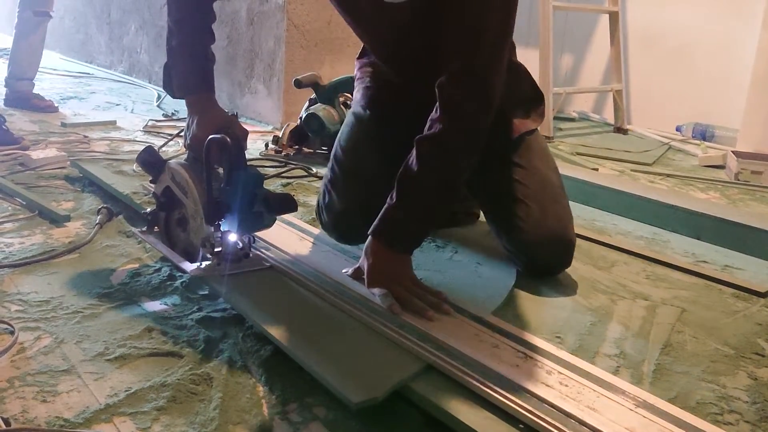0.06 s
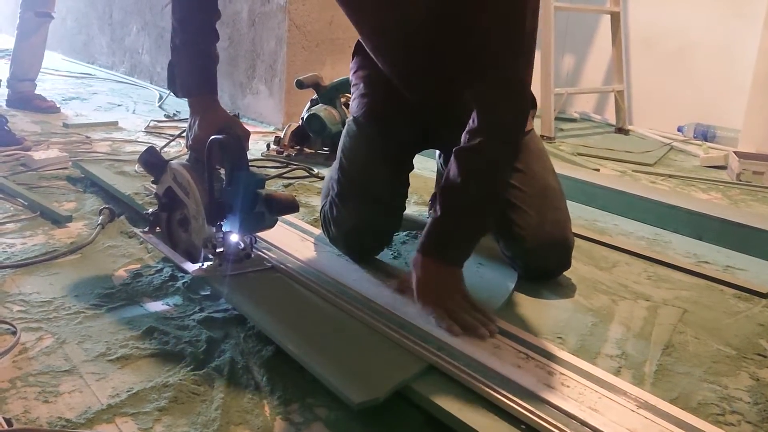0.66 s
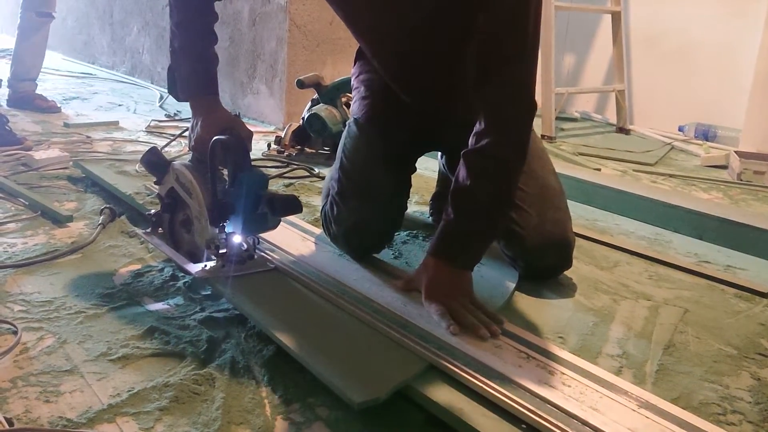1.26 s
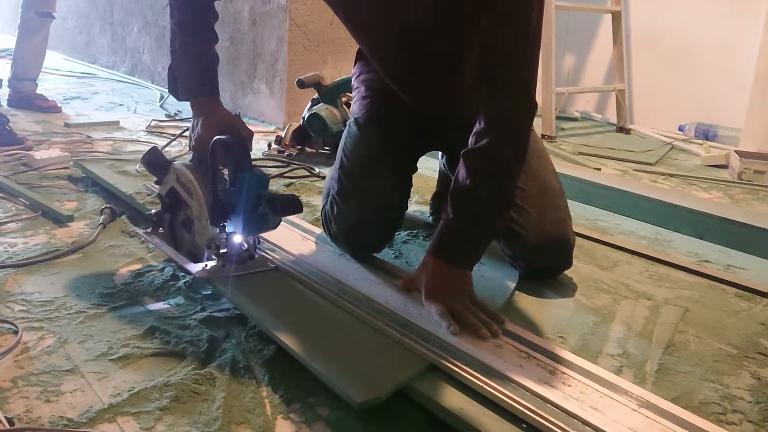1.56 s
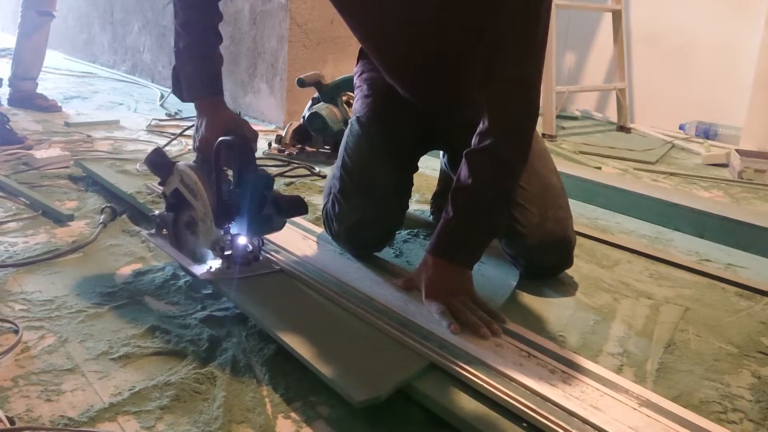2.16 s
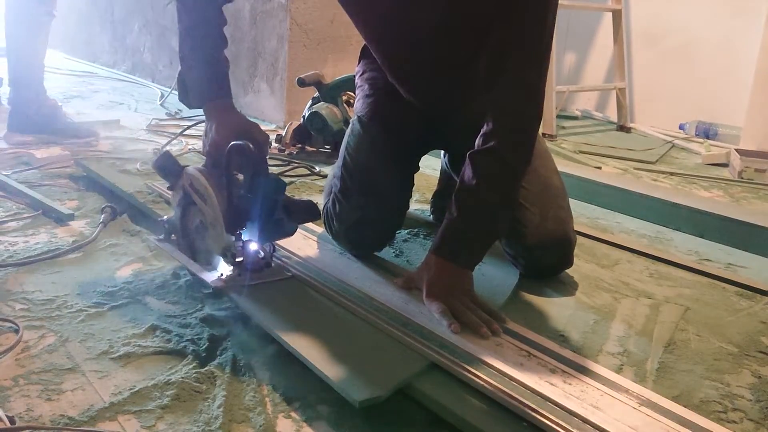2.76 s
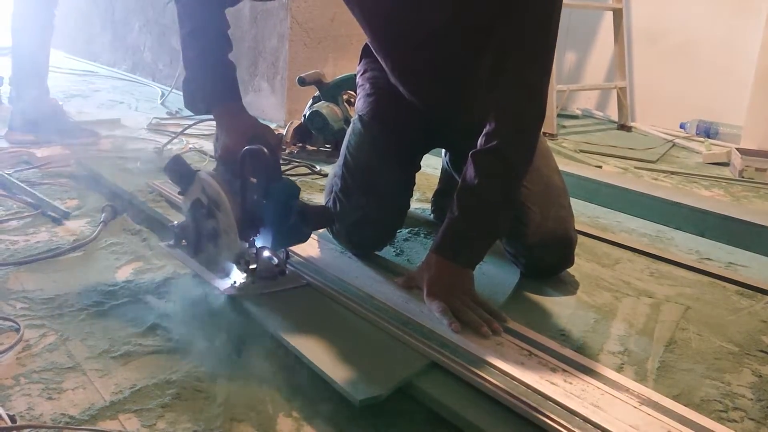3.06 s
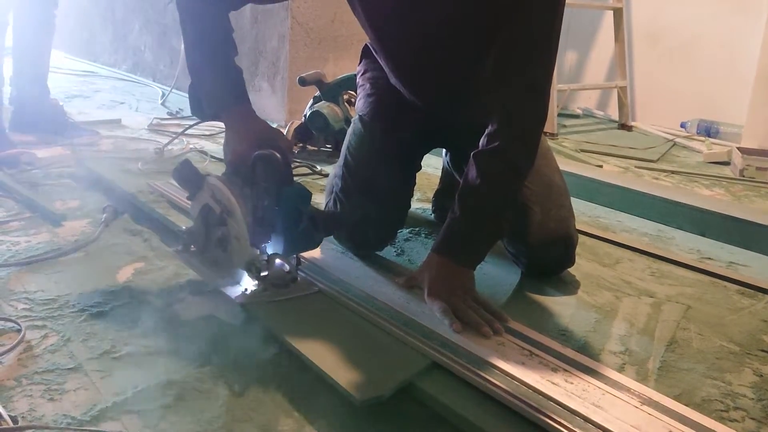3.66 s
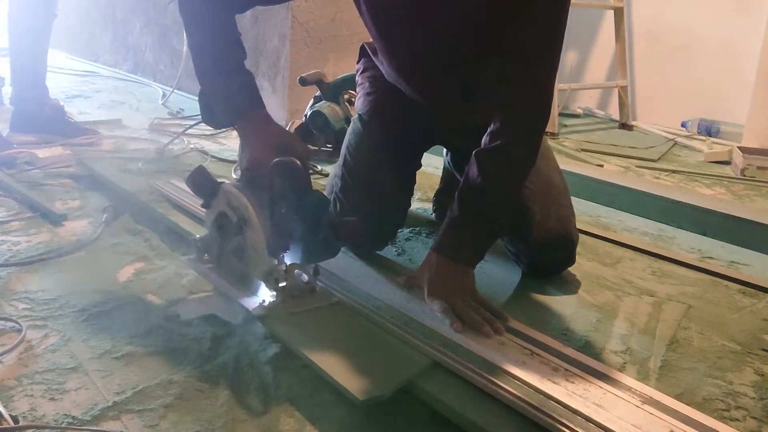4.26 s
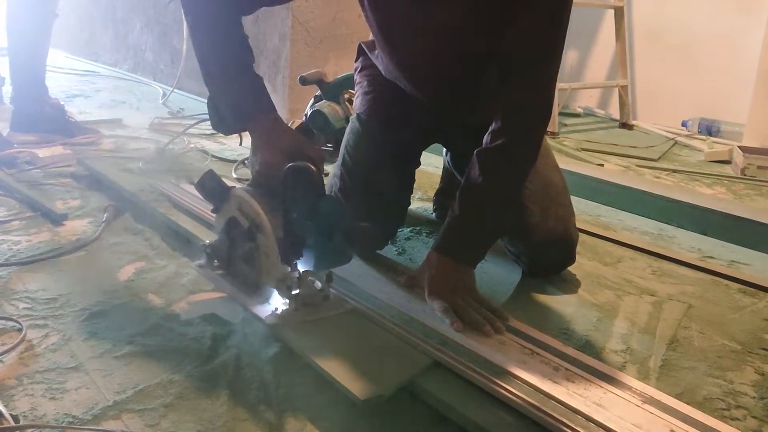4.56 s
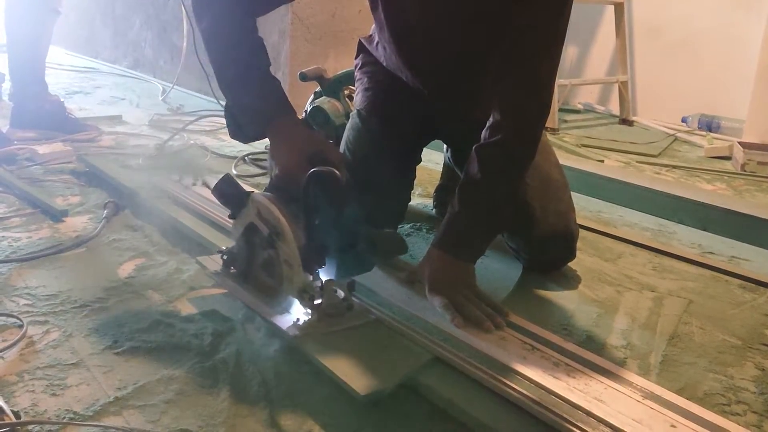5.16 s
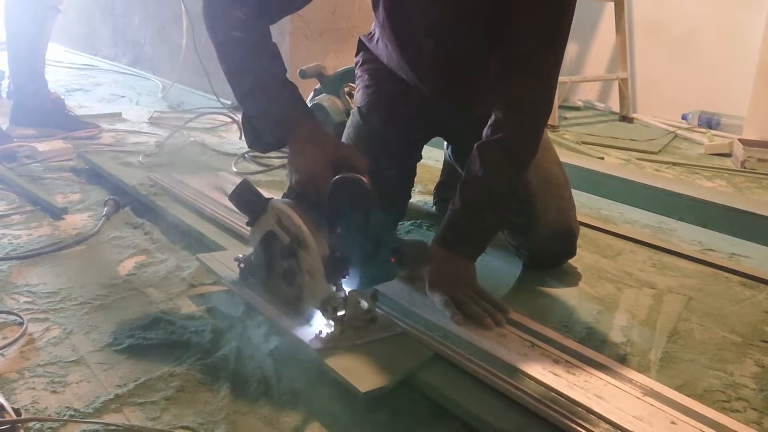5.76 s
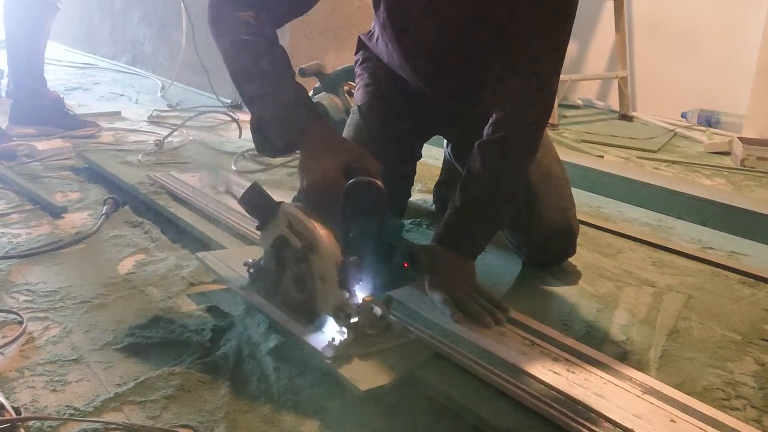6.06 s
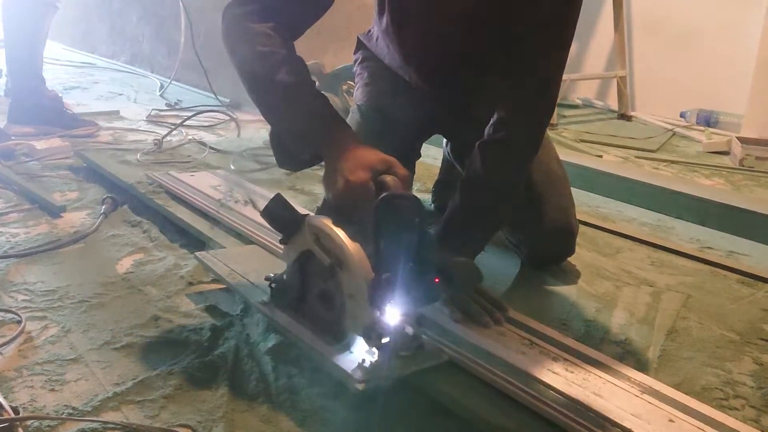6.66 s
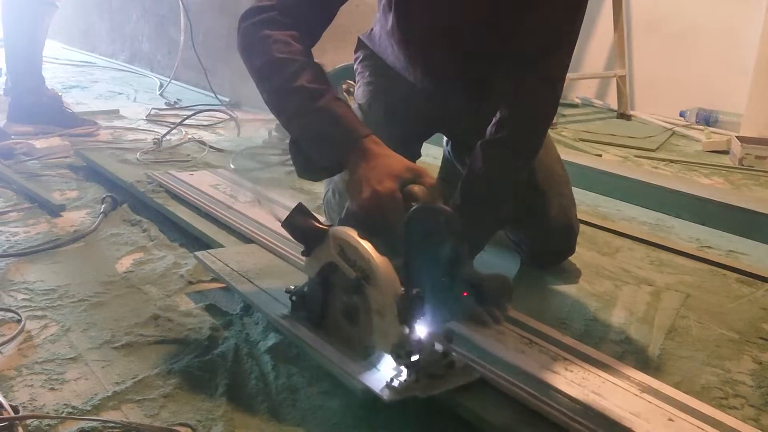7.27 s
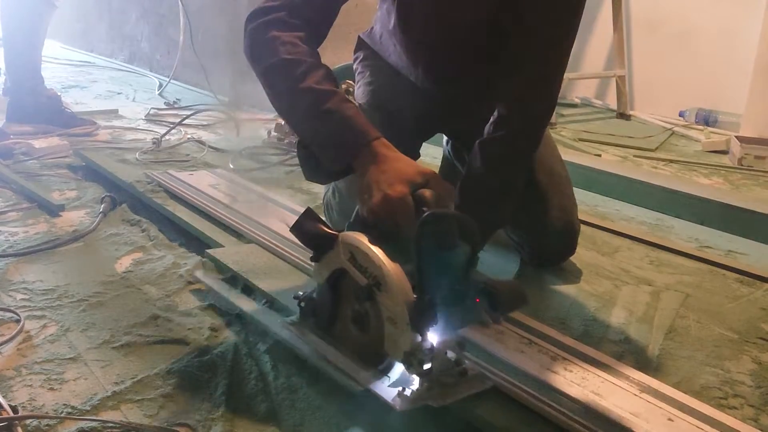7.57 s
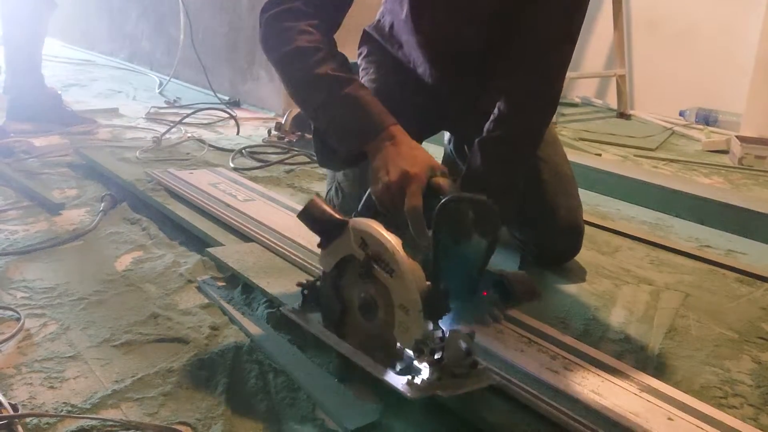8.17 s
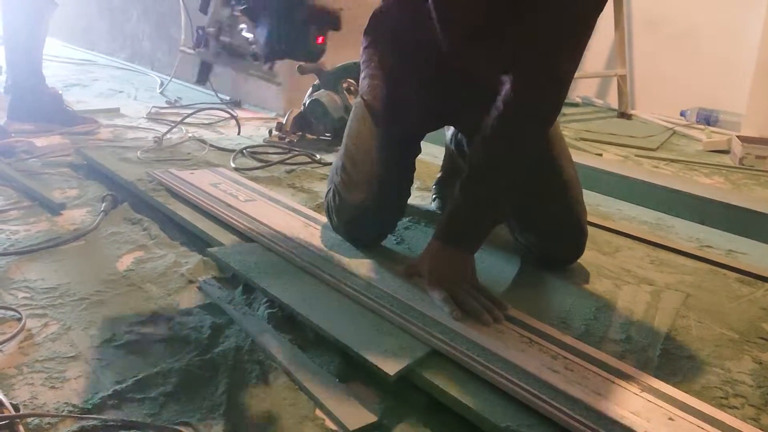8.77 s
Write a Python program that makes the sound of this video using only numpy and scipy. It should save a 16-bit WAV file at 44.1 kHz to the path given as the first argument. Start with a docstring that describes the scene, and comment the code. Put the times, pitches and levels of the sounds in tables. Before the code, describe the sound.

Close up in a bare, slightly echoing room, a cordless circular saw whirs and squeals as it touches a board. It grinds through for about six seconds, hissing and screeching unevenly whenever the blade is pinched, its pitch sagging a little under the load. The saw then brakes in half a second, the guard snaps shut, and a soft metallic ring lingers over a faint low hum.

```python
"""First comes the thin whine and rushing air of a cordless circular saw running free in a bare room.
It grazes a board with a squeal, then is pushed through. The teeth scrape in the same pattern on every
turn, a periodic force that excites the blade's resonances, while the motor sags under the load.
Out of the cut it is braked in half a second, the guard snaps shut and the blade rings on."""
import sys
import numpy as np
from scipy import signal
from scipy.fft import rfft, irfft, next_fast_len
from scipy.io import wavfile
from scipy.ndimage import uniform_filter1d, map_coordinates

SR = 44100
rng = np.random.default_rng(int(sys.argv[2]) if len(sys.argv) > 2 else 0)


def store_pcm(level_fs):
    """Save levels as 16-bit WAV."""
    pcm = np.round(np.clip(level_fs, -1, 1) * 32767).astype(np.int16)
    wavfile.write(sys.argv[1], SR, np.atleast_2d(pcm).T)


N = 397341
TIME = np.arange(N) / SR
SIZE = next_fast_len(N + SR)
HZ = np.maximum(np.arange(SIZE // 2 + 1) * SR / SIZE, 1)
SIDES = np.array([[1], [-1]])  # left, right

# the blade grazes the board, bites in, comes through and is braked
GRAZE_S, BITE_S, THROUGH_S, BRAKE_S = 1.09, 1.78, 7.66, 7.871
FREE_TURNS_PER_S, GEAR_RATIO = 80.6, 49 / 9


def from_db(db):
    """Amplitude ratio of a level in decibels."""
    return 10 ** (np.asarray(db) / 20)


def rms_one(x):
    """Normalisation to unit power."""
    return x / np.sqrt(np.mean(x ** 2) + 1e-20)


def in_time(rows):
    """Linear interpolation of each column over time."""
    times, *columns = np.transpose(rows)
    return [np.interp(TIME, times, c) for c in columns]


def level(rows):
    """Amplitude envelope from rows of t/s, level/dB."""
    return from_db(in_time(rows)[0])


def in_hz(rows):
    """Interpolation of each column over log frequency."""
    hz, *columns = np.transpose(rows)
    return [np.interp(np.log(HZ), np.log(hz), c) for c in columns]


def filtered(x, response):
    """Convolution as a product of spectra."""
    return irfft(rfft(x, SIZE) * response, SIZE)[..., :N]


def shaped(x, spectrum):
    """Spectral shaping by rows of f/Hz, level/dB."""
    return filtered(x, from_db(in_hz(spectrum)[0]))


def coloured(spectrum):
    """Filtered white noise of unit power."""
    return rms_one(shaped(rng.standard_normal(N), spectrum))


def drift(rate):
    """Random modulation of unit spread, with rate new values a second."""
    return np.interp(TIME * rate, np.arange(4096), rng.standard_normal(4096)) * np.sqrt(1.5)


def lagged(x, lag_s):
    """Exponential relaxation towards x."""
    r = np.exp(-1 / (lag_s * SR))
    return signal.lfilter([1 - r], [1, -r], x)


def held(spans, lag_s=0.024):
    """First-order response to rectangular pulses: start/s, end/s, height."""
    steps = np.zeros(N)
    for start, end, value in spans:
        steps[int(start * SR):int(end * SR)] += value
    return lagged(steps, lag_s)


def gated(spans, lag_s=0.024):
    """Attack, hold and release from rows of start/s, end/s, level/dB."""
    return held([(start, end, from_db(db)) for start, end, db in spans], lag_s)


def resonance(x, hz, width_hz):
    """Damped two-pole resonator with unit peak gain."""
    r = np.exp(-np.pi * width_hz / SR)
    feedback = [1, -2 * r * np.cos(2 * np.pi * hz / SR), r * r]
    return signal.lfilter(np.array([1, 0, -1]) * (1 - r * r) / 2, feedback, x)


def squeal(force, hz, width_hz):
    """Forced response of two equal resonators in cascade, at unit power."""
    return rms_one(resonance(resonance(force, hz, width_hz), hz, width_hz))


def band(x, low_hz, high_hz):
    """Band-pass filtering, with the running power evened to 1."""
    part = filtered(x, 1 / (1 + (low_hz / HZ) ** 16) / (1 + (HZ / high_hz) ** 16))
    return part / np.sqrt(uniform_filter1d(part ** 2, size=6000) + 1e-12)


def tones(cycles, partials, waver_db, waver_rate):
    """Superposition of sines on multiples of a cycle count, each wavering in level."""
    return np.sqrt(2) * sum(
        from_db(db + waver_db * drift(waver_rate)) * np.sin(2 * np.pi * (k * cycles + rng.random()))
        for k, db in partials)


# low hum that comes and goes: start/s, end/s, level/dB
HUM_SPANS = [(5.3, 5.9, -50.5), (5.9, 6.348, -40.5), (6.604, 7.251, -42), (7.249, 8.203, -50.5),
             (8.199, 8.803, -41)]
# room rumble and faint wash: f/Hz, level/dB
RUMBLE_SPECTRUM = [(22, -53), (37, -11), (48, 2.5), (70, -3.5), (120, -1), (300, -16), (1500, -46)]
WASH_SPECTRUM = [(100, -2.5), (500, -3), (2800, 0.5), (5500, -7.5), (9000, -31)]
# course of the rumble: t/s, level/dB
RUMBLE_ENVELOPE = [(1.4, -39.5), (2.3, -49), (7.6, -47), (8.3, -45)]
def background(hum_hz, wash_db):
    """Coherence: a wavering hum and a rumble are nearly alike left and right, the wash is diffuse."""
    hum_cycles = np.cumsum(hum_hz + 2.46 * drift(18)) / SR
    hum = gated(HUM_SPANS, lag_s=0.069) * np.sqrt(2) * np.sin(2 * np.pi * hum_cycles)
    rumble = coloured(RUMBLE_SPECTRUM) + from_db(-22) * coloured(RUMBLE_SPECTRUM) * SIDES
    wash = np.array([coloured(WASH_SPECTRUM), coloured(WASH_SPECTRUM)])
    return hum + level(RUMBLE_ENVELOPE) * rumble + from_db(wash_db) * wash


def walls(x, t60_s, shift_hz=0.45):
    """Reverberation: bare walls add a diffuse tail whose pattern shifts as the saw advances."""
    age = TIME[:SR]
    tails = rng.standard_normal((2, 2, SR)) * from_db(-60 * age / t60_s) * (age > 0.003)
    tails /= np.sqrt(np.sum(tails ** 2, axis=-1, keepdims=True))
    first, second = filtered(x, rfft(tails, SIZE))
    shift = 2 * np.pi * shift_hz * np.maximum(TIME - BITE_S, 0)
    return np.cos(shift) * first + np.sin(shift) * second


# left channel relative to right: f/Hz, level/dB, phase lead/rad
STEREO_RESPONSE = [(100.6, 3, -0.5), (356, -4.5, -0.5), (680, 0, 0), (1390, -5, 2.5), (2670, -2, 0.42),
                   (5140, -6, 3), (14300, -1.5, 3)]
def room(x, t60_s, wet_db):
    """Direct and reverberant field: sound reaches the two sides out of phase, then the walls answer."""
    balance_db, lead = in_hz(STEREO_RESPONSE)
    direct = filtered(x, np.exp(0.5j * lead * SIDES))
    return filtered(direct + from_db(wet_db) * walls(x, t60_s), from_db(SIDES * balance_db / 2))


# extra lead of the left channel: t/s, lead/ms
LEFT_LEAD = [(2.0, 0.05), (4.5, 0.02), (6.0, -0.02), (8.0, -0.06)]
def travelling(stereo):
    """Path difference: as the saw advances, its sound arrives later and later on the left."""
    left, right = stereo
    lead = in_time(LEFT_LEAD)[0] * SR / 1000
    return np.array([map_coordinates(left, [np.arange(N) + lead], order=3, mode="nearest"), right])


# rush of air: f/Hz, level/dB
AIR_SPECTRUM = [(130, -26.5), (290, -16.5), (520, -0.5), (680, -2.5), (1100, -5.5), (1450, -5), (1700, 2),
                (2300, -4), (4600, 1.5), (6400, -4), (7600, -21), (8900, -26), (11500, -13), (15500, -21)]
# its course at full speed: t/s, level/dB
AIR_ENVELOPE = [(1.1, -22.5), (2.2, -24), (4.5, -28.5)]
def air_rush(speed):
    """Aerodynamic noise of fan and blade, weakening as they slow."""
    return level(AIR_ENVELOPE) * speed ** 0.6 * coloured(AIR_SPECTRUM)


# motor tones: multiple of motor speed, level/dB
MOTOR_ORDERS = [(1, -21), (2, -14), (4, -6), (8, 0), (13, -13), (16, -15)]
def motor(turns):
    """Rotational harmonics: a thin whine that swells during the graze and sinks under the cut."""
    gain = gated([(0, GRAZE_S, -34), (GRAZE_S, BITE_S, -27), (BITE_S, BRAKE_S, -41)])
    return gain * tones(turns * GEAR_RATIO, MOTOR_ORDERS, waver_db=1, waver_rate=12)


def gear_mesh(turns, pinion_teeth=9):
    """Loaded gears sound at the meshing frequency, tooth count times motor speed."""
    mesh = tones(turns * GEAR_RATIO, [(pinion_teeth, -29)], waver_db=3, waver_rate=12)
    return held([(BITE_S, BRAKE_S, 1)]) * mesh


# gear whine under the brake: multiple of motor speed, level/dB
BRAKE_ORDERS = [(4, -16), (6, -8), (9, 2), (16, -12), (18, -10), (27, -15), (36, -14)]
# response of the gear case: f/Hz, level/dB
CASE_RESPONSE = [(600, -16), (1150, 3), (1450, 2), (1900, -4), (2500, -3), (3700, 2), (5200, -7),
                 (6500, -4), (7700, -23), (9500, -20), (11300, 0), (13000, -30)]
def brake(turns, speed):
    """Backlash: braked gears rattle in phase, more as they slow, until the falling whine breaks up."""
    rattle = (0.012 + 0.05 * (1 - speed) ** 2) * drift(400)
    whine = tones(turns * GEAR_RATIO + rattle, BRAKE_ORDERS, waver_db=3, waver_rate=120)
    grip = lagged(TIME > BRAKE_S, lag_s=0.012)
    return from_db(-19) * shaped(grip * speed ** 1.3 * whine, CASE_RESPONSE)


# knocks of offcut, shoe and guard: t/s, level/dB, T60/s
IMPACTS = [(7.706, -33, 0.069), (8.25, -27.5, 0.13), (8.335, -17.5, 0.086), (8.348, -25, 0.07),
           (8.419, -31.5, 0.28)]
# their colour: f/Hz, level/dB
IMPACT_SPECTRUM = [(250, -36.5), (550, -12), (850, 2.5), (1150, 2.5), (1550, 3.5), (1850, -8), (2630, -7),
                   (4500, -16), (14000, -65)]
def knocks():
    """Impact excitation: wood and metal give bursts of noise that decay exponentially."""
    envelope = sum((TIME >= onset) * from_db(db - 60 * np.maximum(TIME - onset, 0) / t60)
                   for onset, db, t60 in IMPACTS)
    return lagged(envelope, lag_s=0.0011) * coloured(IMPACT_SPECTRUM)


# modes of the free blade: f/Hz, level/dB
FREE_MODES = [(1459, -9), (1766, -6), (2422, -3.5), (2536, -2), (2573, -2), (2681, -3.5), (3472, -14),
              (4247, -6.5), (4905, -19), (5430, -18), (6180, -18), (6420, -14)]
# their envelope before damping: t/s, level/dB
FREE_ENVELOPE = [(7.85, -120), (8.1, -42), (8.4, -43), (8.55, -37.5), (8.63, -40), (9.0, -36.5)]
def free_blade(damped_from_s, db_per_s_khz):
    """Free vibration: out of the kerf the blade rings on, its high modes dying sooner."""
    age = np.maximum(TIME - damped_from_s, 0)
    modes = sum(from_db(-db_per_s_khz * age * hz / 1e3)
                * tones(TIME, [(hz, db)], waver_db=2.5, waver_rate=25) for hz, db in FREE_MODES)
    return level(FREE_ENVELOPE) * modes


# thrum of the board: multiple of blade speed, level/dB
THRUM_ORDERS = [(7, -6.5), (8, -5.5), (9, -8.5), (11, -7), (12, -3), (14, -5), (15, 1)]
# its course: t/s, level/dB
THRUM_ENVELOPE = [(1.75, -44), (1.95, -40), (3.0, -41), (3.9, -40.5), (4.4, -50), (4.8, -53)]
def board_tones(turns, twist_db, deep_s=3.88):
    """Forced vibration: the board thrums early on; deep in the cut the four slots make it drone."""
    drone_gain = held([(deep_s, THROUGH_S, 1)]) * from_db(-48.5 + 0.7 * twist_db + 3 * drift(20))
    drone = drone_gain * np.sin(2 * np.pi * 4 * turns)
    thrum = level(THRUM_ENVELOPE) * tones(turns, THRUM_ORDERS, waver_db=4.5, waver_rate=5)
    return drone + (TIME < THROUGH_S) * thrum


# whistle of the teeth: multiple of blade speed, level/dB
WHISTLE_ORDERS = [(24, -1), (48, -4)]
# its course at full speed: t/s, level/dB
WHISTLE_ENVELOPE = [(1.75, -42.5), (2.0, -36), (2.9, -26), (3.3, -45)]
def tooth_whistle(turns, speed):
    """The teeth whistle at the tooth-passing frequency and an octave below it."""
    return speed * level(WHISTLE_ENVELOPE) * tones(turns, WHISTLE_ORDERS, waver_db=6, waver_rate=14)


def scrape(turns, rough, wobble, slots, harmonics=200):
    """Periodic plus random force: the same uneven teeth return each turn, crumbling wood adds noise."""
    rim = rms_one(irfft(np.r_[0, np.exp(2j * np.pi * rng.random(harmonics))], 4096))
    repeating = np.interp(turns % 1, np.linspace(0, 1, len(rim), endpoint=False), rim)
    rough = np.clip(rough, 0, 1)
    # a slightly warped blade presses harder once a turn, and its four slots chop the force
    pressure = 1 + wobble * np.cos(2 * np.pi * turns) + slots * np.cos(2 * np.pi * 4 * turns)
    return pressure * (np.sqrt(1 - rough) * repeating + np.sqrt(rough) * rng.standard_normal(N))


# grazing squeal: f/Hz, level/dB
GRAZE_SPECTRUM = [(1000, -20), (3000, -16), (3750, -2), (4300, -12), (4850, -3), (5550, -4), (5950, -7),
                  (7250, -6), (8000, -26), (9000, -30), (9900, -12), (12200, -9), (12550, -3), (13260, -2),
                  (13900, -13), (15500, -16)]
def graze(turns):
    """Periodic excitation: skidding teeth squeal on a harmonic comb of the blade's speed."""
    skid = 0.0008 * drift(300)
    force = scrape(turns + skid, rough=0.05, wobble=0.1, slots=0.2)
    return gated([(GRAZE_S, BITE_S, -22.5)]) * rms_one(shaped(force, GRAZE_SPECTRUM))


# resonances of the tooth tips: f/Hz, bandwidth/Hz, level/dB
TIP_MODES = [(9980, 150, -33), (11880, 220, -30), (13250, 220, -29)]
def screech(turns, shallow_until_s=2.8):
    """Resonance: the tooth tips screech while the kerf is shallow."""
    force = scrape(turns, rough=0.3, wobble=0.2, slots=0.2)
    tips = sum(from_db(db + 1.5 * drift(11)) * squeal(force, hz, width) for hz, width, db in TIP_MODES)
    return held([(BITE_S, shallow_until_s, 1)]) * tips


# the kerf pinches the blade: start/s, end/s, level/dB
PINCH_SPANS = [(2.29, 2.375, -16), (3.779, 4.651, -21), (4.7, 5.45, -28.5), (5.911, 5.99, -18),
               (6.299, 6.375, -20.5), (6.45, 6.83, -23.5), (6.829, 7.168, -25), (7.225, 7.603, -25),
               (7.62, 7.77, -30)]
def chatter(turns):
    """Stick-slip: the pinched blade grabs on every turn, hammering one broad mode in uneven bursts."""
    grab = scrape(turns, rough=0.15, wobble=0.9, slots=0.5) * from_db(1.8 * drift(35))
    return gated(PINCH_SPANS, lag_s=0.014) * squeal(grab, hz=3660, width_hz=120)


# singing modes of the pinched blade: start/s, end/s, f/Hz, level/dB
SINGING_MODES = [(1.15, 1.36, 1765, -28), (1.16, 1.8, 5534, -30), (1.2, 1.85, 5141, -32),
                 (1.55, 1.88, 4821, -30), (2.4, 2.62, 617, -34), (2.67, 2.93, 1102, -29.5),
                 (2.7, 2.84, 2628, -24), (2.7, 2.95, 1783, -29), (3.025, 3.28, 1750, -27),
                 (3.22, 3.58, 693, -29.5), (3.41, 3.54, 2780, -25), (3.58, 3.82, 2270, -25),
                 (4.5, 4.92, 1755, -26.5), (4.52, 4.92, 1608, -25), (5.2, 5.6, 4976, -28),
                 (5.92, 6.15, 5505, -27), (6.33, 6.58, 1604, -24), (6.53, 6.8, 5503, -23),
                 (6.58, 6.8, 4344, -25), (6.8, 7.15, 3765, -25), (6.84, 7.03, 2268, -25),
                 (6.98, 7.64, 3677, -25), (7.25, 7.62, 3975, -26), (7.48, 7.75, 5162, -28)]
def singing(turns):
    """Single modes sing out in the kerf, amplitude-modulated once a turn."""
    modes = np.zeros(N)
    for start, end, hz, db in SINGING_MODES:
        cycles = hz * TIME + 0.1 * drift(35) + 0.05 * drift(400)  # slow wander, fast rasp
        modes += gated([(start, end, db)], lag_s=0.018) * np.sin(2 * np.pi * cycles)
    throb = 1 + 0.085 * np.cos(2 * np.pi * turns)
    return np.sqrt(2) * modes * throb * from_db(2 * drift(25))


# the hand pushes (+) or eases off (-): start/s, end/s, sag/(turns/s), force/dB, sideways twist/dB
HAND_PUSHES = [(1.134, 1.29, 0, 2.5, 4), (1.325, 1.44, 0, -16, -11), (1.826, 1.943, 1.5, -1.5, 9.5),
               (1.97, 2.385, 0.81, -2, 4), (2.404, 2.603, .5, -3, 1.5), (2.659, 2.878, 1, 1, 8),
               (2.921, 3.178, 4, 1, 7.5), (3.183, 3.38, -1, -5.5, 1), (3.5, 3.782, 0.12, 2, 2.5),
               (3.801, 4.02, 2, 1.5, 4), (4.381, 4.88, 2.5, 3, 3.5), (4.87, 5.022, 0, -2.5, 0),
               (5.063, 5.321, 2, 2.5, 6.5), (5.412, 5.569, 2.5, 2, 4.5), (5.871, 6.059, 1.3, 1.5, 4.5),
               (6.293, 6.5, 1.5, 1, 7), (6.5, 6.679, 0.5, -3, 6.5), (6.797, 7.161, 1.75, 0.5, 3.5),
               (7.23, 7.622, 1.5, -0.5, 3.5)]
def hand(column, lag_s):
    """First-order response to the pushes: column 2 is sag, 3 force, 4 twist."""
    return held([(row[0], row[1], row[column]) for row in HAND_PUSHES], lag_s)


def blade_speed(inertia_s=0.09, sink_s=1.5, recover_s=0.13, brake_turns_per_s2=190):
    """Rotational inertia: turns per second lag behind the load, then fall steadily under the brake."""
    touch = 0.26 * lagged(TIME > GRAZE_S, inertia_s)
    depth = 1 - np.exp(-np.maximum(TIME - BITE_S, 0) / sink_s)
    feed = 6.2 * depth * np.exp(-np.maximum(TIME - THROUGH_S, 0) / recover_s)
    pushes = hand(2, inertia_s)
    braked = brake_turns_per_s2 * lagged(np.maximum(TIME - BRAKE_S, 0), lag_s=0.02)
    return np.maximum(FREE_TURNS_PER_S - touch - feed - pushes - braked, 0)


def contact(graze_db, cut_db, end_s=THROUGH_S, rub_db=-8):
    """Friction envelope: grazing, cutting, then softer rubbing in the kerf until the brake."""
    rubbing = (end_s, BRAKE_S, cut_db + rub_db)
    return gated([(GRAZE_S, BITE_S, graze_db), (BITE_S, end_s, cut_db), rubbing])


def grit(rasp, force_db, touch_s=0.054, fade_db_per_s=0.07, clear_s=7.74):
    """Fracture noise: crumbs spray unevenly at first touch; deeper in the kerf fewer escape."""
    hiss = band(rasp, 5800, 15150) * from_db(2 * drift(100) + 0.5 * drift(13))
    escape_db = 11.5 * (TIME < GRAZE_S + touch_s) - fade_db_per_s * np.maximum(TIME - BITE_S, 0)
    gain = contact(-27, -19.2, end_s=6.8, rub_db=-6.5) * held([(0, clear_s, 0.83)])
    return gain * from_db(0.4 * force_db + escape_db) * hiss


# roughness of the cut: t/s, random share of the force's power
ROUGHNESS = [(1.12, 0.3), (1.78, 0.34), (1.95, 0.74), (3.1, 0.5), (4.1, 0.65), (5.3, 0.46), (7.4, 0.52),
             (7.86, 0.7)]
# broad colour of the scraping: f/Hz, level/dB
RASP_SPECTRUM = [(100, -62), (230, -61), (550, -13.5), (900, -20.5), (2000, -14), (3500, -12), (6000, -17),
                 (7200, -19), (8000, -30), (9000, -37.5), (9800, -22), (11700, -15.5), (13500, -21),
                 (15500, -16)]
# blade resonances in the cut: f/Hz, bandwidth/Hz, level/dB
BLADE_MODES = [(695, 12, -9), (1099, 15, -17), (1170, 20, -15), (1225, 30, -12), (1297, 55, -10),
               (1421, 30, -8.5), (1500, 30, -11), (1608, 11, 1.5), (1755, 17, -0.5), (2267, 14, -2),
               (2455, 40, -2.5), (2630, 20, -11), (2782, 26, -8), (3005, 28, -7), (3350, 70, -9),
               (3465, 30, -1.5), (3680, 100, -2), (3980, 34, -2.5), (4345, 45, -8), (4620, 24, 0),
               (4710, 20, -4), (4824, 14, -3.5), (4866, 16, -2.5), (4975, 16, 0.5), (5160, 18, 0),
               (5420, 30, -4), (5508, 16, -1), (5825, 28, -8), (5950, 24, -8), (6795, 45, -7)]
# the board sounding under the teeth: t/s, level/dB
BOARD_ENVELOPE = [(1.1, -49), (2.5, -42), (3.6, -36.5), (4.3, -36), (5.6, -39), (6.6, -37.5), (7.6, -39)]
def cutting(turns, force_db, twist_db):
    """Modal superposition: scraping drives the blade's resonances, the board and a hiss of grit."""
    rough, = in_time(ROUGHNESS)
    # each flank of the blade rubs the kerf with its own pattern
    flanks = [scrape(turns, rough * 1.06, wobble=0.2, slots=0.3) for _ in range(2)]
    # some scraping reaches the air without ringing a mode
    steel = from_db(-2.5) * shaped(scrape(turns, rough, wobble=0.078, slots=0.48), RASP_SPECTRUM)
    for k, (hz, width, db) in enumerate(BLADE_MODES):
        # the contact point wanders, so each mode swells and fades on its own
        steel += from_db(db + 3.8 * drift(6)) * resonance(flanks[k % 2], hz, width)
    whine = contact(-24.5, -19) * from_db(0.34 * force_db) * band(steel, 3140, 6800)
    middle = contact(-52, -30) * from_db(1.1 * force_db) * band(steel, 2190, 3260)
    # twisting the saw in the kerf wakes the slow bending modes
    bending = contact(-33, -31) * from_db(0.27 * force_db + twist_db) * band(steel, 1150, 2130)
    board_gain = held([(GRAZE_S, THROUGH_S, 1)]) * level(BOARD_ENVELOPE) * from_db(0.49 * twist_db)
    board = board_gain * band(steel, 140, 1366)
    rasp = shaped(scrape(turns, rough * 2, wobble=0.12, slots=0.094), RASP_SPECTRUM)
    spray = grit(rasp, force_db)
    flutter = from_db(0.99 * drift(14))  # the board is uneven
    return (whine + middle + bending + board) * flutter + spray


def scene():
    """Directivity: the saw's tones beam at the listener, the cut radiates all round the room."""
    turns_per_s = blade_speed()
    turns = np.cumsum(turns_per_s * (1 + 0.0004 * drift(30))) / SR
    speed = turns_per_s / FREE_TURNS_PER_S
    force_db, twist_db = hand(3, lag_s=0.013), hand(4, lag_s=0.013)
    noises = air_rush(speed) + cutting(turns, force_db, twist_db) + knocks()
    sprayed = room(noises, t60_s=0.32, wet_db=1)
    drive = (gear_mesh(turns) + tooth_whistle(turns, speed)
             + board_tones(turns, twist_db) + brake(turns, speed))
    squeals = singing(turns) + graze(turns) + screech(turns) + chatter(turns)
    beamed = room(drive + squeals, t60_s=0.5, wet_db=-6)
    # the motor and the lifted blade stand clear of the floor and reach both sides in phase
    body = motor(turns) + free_blade(damped_from_s=8.46, db_per_s_khz=12)
    pan = from_db(-1.5 * SIDES)
    return travelling(sprayed + beamed) + pan * body + background(hum_hz=92, wash_db=-40.5)


def record(dry, cutoff_hz=15800):
    """Clipping of the highest peaks, then a steep low-pass."""
    return filtered(np.clip(dry, -0.95, 0.95), 1 / (1 + (HZ / cutoff_hz) ** 300))


dry = scene()
out = record(dry)
store_pcm(out)
```